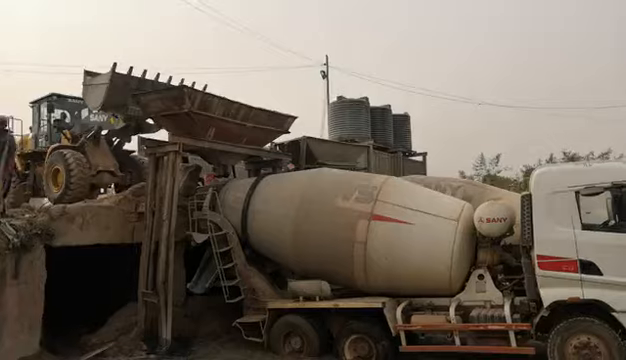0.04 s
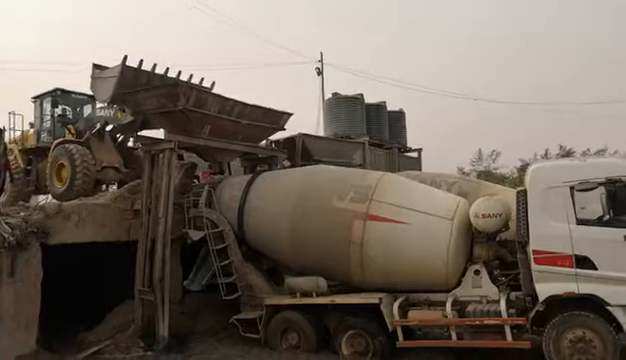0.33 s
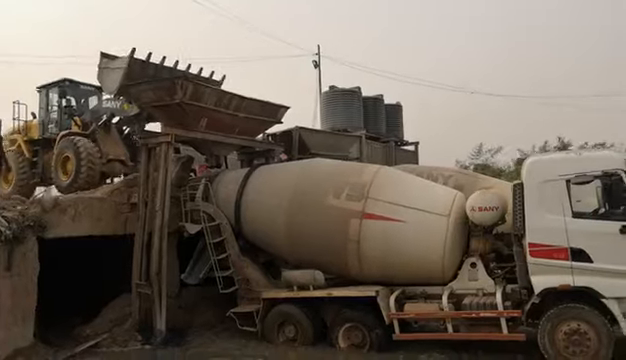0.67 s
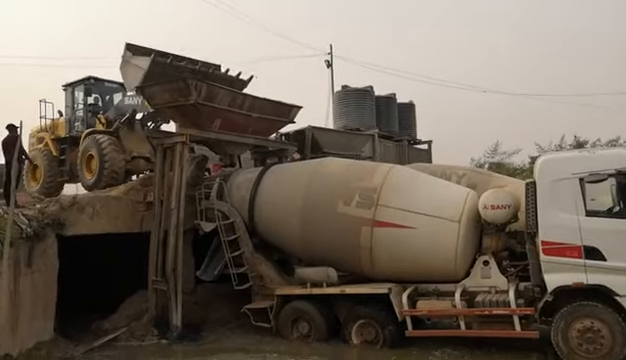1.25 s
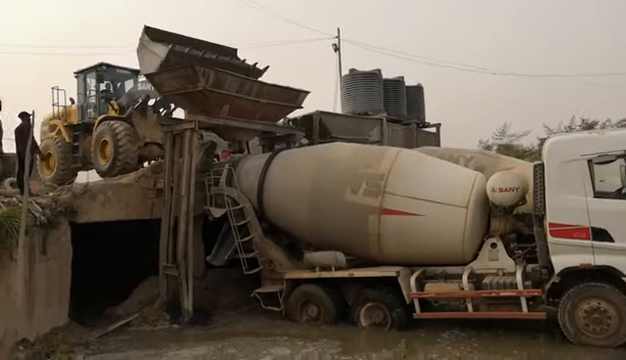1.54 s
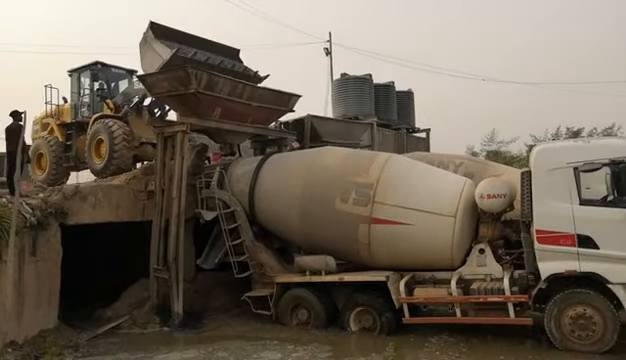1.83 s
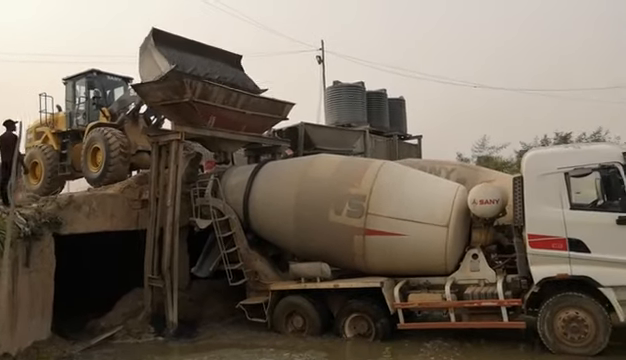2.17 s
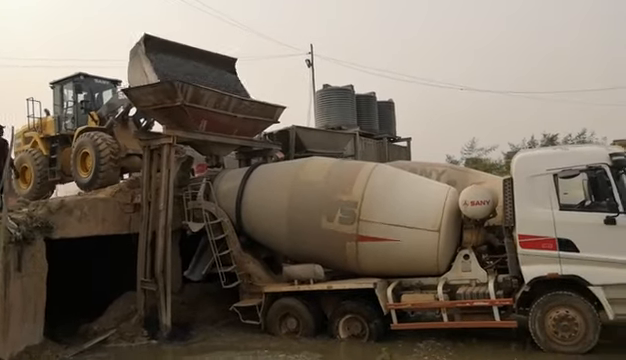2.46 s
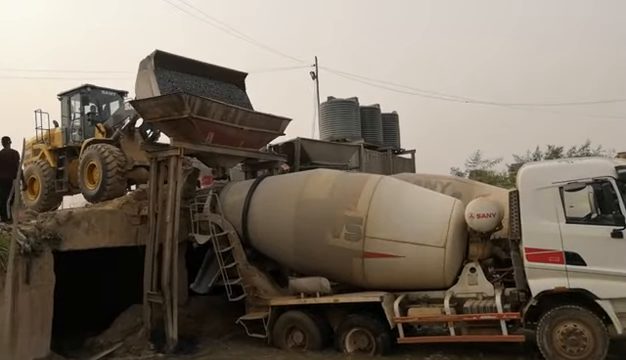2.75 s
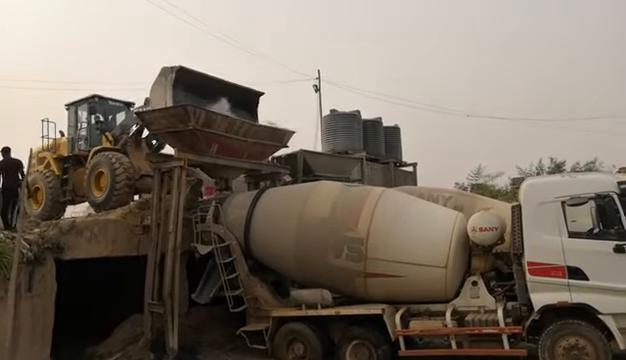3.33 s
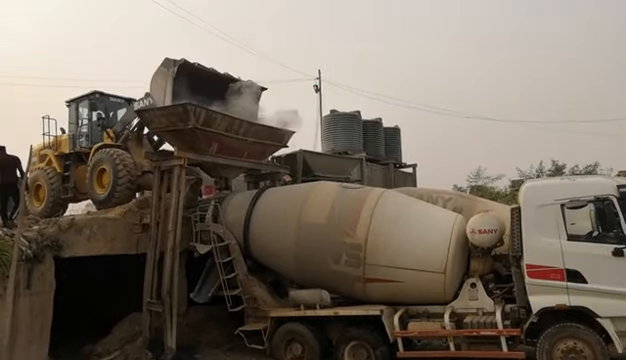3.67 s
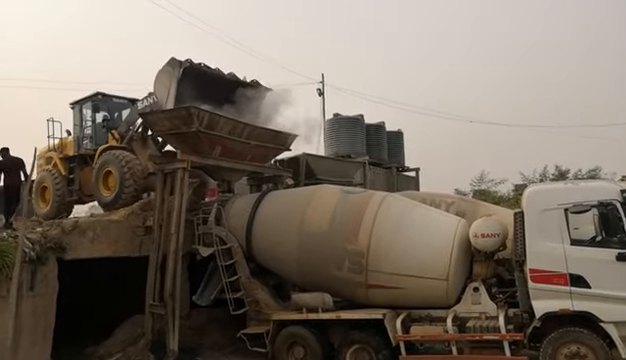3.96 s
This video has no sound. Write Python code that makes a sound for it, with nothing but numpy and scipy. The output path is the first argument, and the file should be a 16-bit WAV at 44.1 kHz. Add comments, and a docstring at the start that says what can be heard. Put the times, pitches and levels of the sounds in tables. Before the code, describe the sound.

A load of gravel rattles into a metal hopper outdoors. Two diesel engines rumble throughout, one idling and one rising in pitch, before sharp stone hits and a bucket clank start the loud, brief pour.

```python
"""Two diesels drone on a building site: a mixer truck idles, a wheel loader revs up to tip its bucket.
Their exhausts hum and rumble, and clatter pulses with the firings. Grit slides, the bucket clanks,
and the first stones crack into a steel hopper and set it ringing. Then the load of gravel rushes
after them, a swarm of tiny impacts, while an automatic gain control ducks the mix under the pour."""
import sys
import numpy as np
from scipy import signal
from scipy.fft import rfft, irfft
from scipy.io import wavfile
from scipy.ndimage import uniform_filter1d

SR = 44100
rng = np.random.default_rng(int(sys.argv[2]) if len(sys.argv) > 2 else 0)


def int16_out(signal):
    """Quantize to a 16-bit WAV file."""
    q = np.round(np.clip(np.atleast_2d(signal).T, -1, 1) * 32767)
    wavfile.write(sys.argv[1], SR, q.astype(np.int16))


N = 176400
T = np.arange(N) / SR

# Swell of the pour. Each row: time in seconds, level in dB.
POUR_LEVEL = [(2.6, -34.5), (2.67, -20), (2.705, -10.5), (2.77, -16), (2.82, -8.5), (2.94, -5),
              (3.04, -10.5), (3.12, -6), (3.21, -14.5), (3.28, -16.5), (3.34, -20), (3.47, -19),
              (3.55, -14), (3.67, -24.5), (3.85, -26.5), (4, -24)]
# Single stones on steel. Each row: start in seconds, level in dB, left over right in dB,
# brightness in dB per octave.
STONE_HITS = [(2.4333, -6.5, -6.5, 1), (2.4364, -10, 2, -5), (2.6235, -15, 10, 2.5), (2.6651, -15, 7, 1),
              (2.6868, -19, 0, -4), (2.699, -6, -5, -11), (2.757, -11, -6, -1), (2.811, -8, -2, -14),
              (2.9379, -7, 3, -2), (2.975, -7, -5.5, -1), (3.088, -9.5, -12, 4.5), (3.2704, -19, -3, -7),
              (3.8132, -18.5, 1, 6), (3.8996, -17.5, -1, -5.5)]
# Dull blows on the tipping bucket. Each row: start in seconds, level in dB.
BUCKET_HITS = [(2.6245, -12.5), (2.6653, -19)]
# Grit sliding as the bucket tilts. Each row: peak time in seconds, half-width in seconds, level in dB.
GRIT_SWELLS = [(0.55, 0.036, -38.5), (1.36, 0.0088, -32.5), (1.408, 0.013, -32.5), (1.968, 0.02, -33.5),
               (2.035, 0.016, -34), (2.09, 0.048, -35.5)]
# Ring of the steel. Each row: pitch in Hz, level in dB, seconds to fade by 60 dB.
HOPPER_MODES = [(714, -23.5, .05), (1039.7, -13, 0.045), (1208, -11, 0.044), (1350, -16, 0.034),
                (1772, -9.5, 0.044), (2240.6, -10.5, 0.053), (2330, -16, 0.049), (2760, -17, 0.022),
                (3477, -12.5, 0.086), (3986, -7.5, 0.033), (4260, -21, 0.027), (7100, -7, 0.012)]
BUCKET_MODES = [(1019, -12.5, 0.1495), (1804, -3, 0.076), (3500, -11, 0.063), (6860, -7.5, 0.092)]
# Tone colour of each noise layer. Each row: frequency in Hz, relative spectral density in dB.
GRAVEL_COLOUR = [(200, -5.5), (340, -4), (450, -17), (660, -5), (1050, -3.5), (1400, -3.5), (1900, 3),
                 (2450, 1.5), (3000, -4.5), (4000, -5.5), (4900, -10), (6300, -5.5), (7500, -6)]
CRACK_COLOUR = [(400, -15), (1000, -7), (1900, -1.5), (2700, 6.5), (3250, 0), (4050, 3), (5000, -9),
                (6600, 0.5), (7500, 6), (8300, -7.5)]
GRIT_COLOUR = [(1200, -15), (2000, -2), (3800, 2.5), (5600, 2.5), (7500, -5.5)]
RUMBLE_COLOUR = [(20, -6.5), (35, -17), (60, 4.5), (100, -2), (150, 0.5), (220, -2.5), (270, -7), (340, -5),
                 (430, -18.5), (600, -39)]
CLATTER_COLOUR = [(400, -10.5), (510, -10), (680, -3), (1000, -4.5), (1300, -4), (1850, 1), (2650, -1.5),
                  (3150, -18), (4000, -16.5), (4700, -19.5), (6300, -22.5), (7500, -31)]
# The loader revving. Each row: time in seconds, firing rate in Hz, gain in dB.
LOADER_REVS = [(.36, 73.8, -14), (.7, 68.04, -16), (.82, 66.2, 2), (1.03, 63.66, 3), (1.22, 66.8, 0.5),
               (1.5, 78.7, -0.5), (1.75, 89.4, -5), (1.95, 94.3, 3), (2.08, 94.6, 0.5), (2.25, 101.9, -7),
               (2.7, 103.2, -2.5), (3.1, 102, -6), (3.4, 96.06, 4), (3.6, 97.35, -6.5), (3.85, 98.15, -3),
               (4, 96.5, 2)]
# Its note grows ragged under load. Each row: time in seconds, roughness from 0 to 1.
LOADER_ROUGHNESS = [(1.1, 0.26), (1.5, 0.43), (2.1, 0.39), (3.3, .75)]
# Partials of each exhaust note. Each row: multiple of the firing rate, base level in dB.
LOADER_PARTIALS = [(1, -44.5), (2, -40), (2.5, -51.5), (3, -36), (4, -52.5)]
TRUCK_PARTIALS = [(.5, -49), (1, -28.5), (1.5, -43), (2, -44.5), (3, -44), (4, -44.5), (5, -45.5)]
# Fader moves for the truck's note, the rumble and the clatter. Each row: time in seconds, gain in dB.
TRUCK_FADER = [(.36, 1.5), (.74, 5.5), (.95, 1), (1.4, 2.5), (2.4, 2), (3.2, -4.5), (3.75, 1.5), (4, -2)]
RUMBLE_FADER = [(.36, -27), (.7, -28.5), (1.05, -33), (1.6, -29), (2.5, -31.5), (3.1, -38), (3.45, -28),
                (3.7, -29.5), (4, -30.5)]
CLATTER_FADER = [(.38, -28), (.53, -28), (.64, -30), (.73, -26), (.84, -30), (1.25, -30), (1.33, -28.5),
                 (1.55, -27.5), (1.6, -29), (1.635, -27.5), (1.7, -31), (1.98, -29), (2.04, -26.5),
                 (2.1, -29), (2.18, -30.5), (2.6, -30.5), (3.7, -26)]
# Loose panels. Each row: pitch in Hz, bandwidth in Hz, level against the clatter in dB.
PANEL_MODES = [(1788, 85, -12), (5530, 95, -20.5)]
# Stereo spread. Each row: frequency in Hz, side over mid in dB, left over right in dB (eased in the bass).
POUR_STEREO = [(200, -32.5, -19), (330, -15.5, -5.5), (530, -8, 7), (950, -17, 4), (1810, -4.5, -6.5),
               (2730, 2, 1), (4550, -1.5, -10), (7600, 0.5, 3.5)]
ENGINE_STEREO = [(50, -37.5, 6.5), (170, -44, 1), (308, -12, -3), (540, 0, -3.5), (940, -5, 0),
                 (1600, -4.5, -2.5), (2820, 2, 0.5), (4730, 0, -6), (7400, 5.5, -3)]

TRUCK_FIRING_HZ = 44.95
PIPE_HZ, PIPE_WIDTH_HZ = 199.6, 14.3  # where the loader's exhaust pipe booms
GRAIN_SPREAD_DB, GRAIN_DECAY_S = 2.5, 0.0047
CRACK_RISE_S, CRACK_DECAY_S, CLANK_RISE_S = 0.0017, 0.0035, 0.0026
MONO_BELOW_HZ, NOISE_TOP_HZ, MIX_TOP_HZ = 1500, 7500, 8450
DUCK_ABOVE_DB, DUCK_SLOPE, RELEASE_DB_PER_S, PEAK_CEILING = -17, 0.55, 27.5, 0.68


def gravel():
    """Pebbles click on each other and on the steel, blurring into a rush between the hopper walls."""
    clicks = contacts(per_second=1000)
    rush = coloured(lambda: grains(clicks), GRAVEL_COLOUR, POUR_STEREO, flicker_db=0.26)
    rush = rms_one(reflected(rush, t60=0.059, wet_db=-10.5))
    brightness = np.full(N, -1.5)  # dB per octave: small pebbles ring the high modes less
    steel = rms_one(low_pass(hopper(np.array([clicks, clicks]), brightness), NOISE_TOP_HZ))
    flow = from_db(in_time(POUR_LEVEL)[0] + 0.5 * drift(25))
    return flow * (from_db(0.33) * rush + from_db(-9.5) * steel)


def stones():
    """Each big stone gives a short crack and rings the hopper; the yard throws it back."""
    clicks, brightness, bursts = np.zeros((2, N)), np.zeros(N), 0
    for start, db, pan_db, tilt_db in STONE_HITS:
        gain, age = from_db(db) * panned(pan_db), np.maximum(T - start, 0)
        clicks[:, int(start * SR)] = gain[:, 0]
        brightness[int(start * SR)] = tilt_db
        bursts = bursts + gain * np.exp(-age / CRACK_DECAY_S) * (1 - np.exp(-age / CRACK_RISE_S))
    noise = coloured(white, CRACK_COLOUR, POUR_STEREO, flicker_db=7.5, top_hz=MIX_TOP_HZ)
    crack = from_db(-5) * bursts * noise
    steel = from_db(-1.5) * hopper(clicks, brightness)
    return reflected(steel + crack, t60=0.16, wet_db=-4)


def hopper(clicks, brightness):
    """Every contact drives each steel mode with a strength of its own."""
    hits, out = np.flatnonzero(clicks[0]), 0
    for hz, db, t60 in HOPPER_MODES:
        chance = rng.standard_normal((12000, 2))[np.arange(len(hits)) % 12000].T
        if hz < MONO_BELOW_HZ:  # low modes share one strength between the sides
            chance = chance[0]
        strength = np.sign(chance) * np.abs(chance) ** .5
        tilt = from_db(brightness[hits] * np.log2(hz / 2000))
        struck = np.zeros((2, N))
        struck[:, hits] = clicks[:, hits] * strength * tilt
        out = out + from_db(db) * ring(struck, hz, t60)
    return out


def bucket():
    """The shifting load makes the bucket clank: a soft attack, then a ring."""
    out = np.zeros((2, N))
    for start, db in BUCKET_HITS:
        age = np.maximum(T - start, 0)
        for hz, mode_db, t60 in BUCKET_MODES:
            envelope = (1 - np.exp(-age / CLANK_RISE_S)) * from_db(-60 * age / t60)
            phase = 2 * np.pi * hz * age + rng.uniform(0, 2.4, (2, 1))
            out += from_db(db + mode_db) * envelope * np.sin(phase)
    return reflected(out, t60=0.13, wet_db=-3.5)


def grit():
    """Fine grit hisses in short slides before the load lets go."""
    level = sum(from_db(db) * np.exp(-.5 * ((T - peak) / width) ** 2) for peak, width, db in GRIT_SWELLS)
    clicks = contacts(per_second=7200)
    return level * coloured(lambda: grains(clicks), GRIT_COLOUR, ENGINE_STEREO, flicker_db=1.5)


def engines():
    """The diesel bed: two exhaust notes, with rumble and clatter that pulse with the firings."""
    loader_hz, loader_db = in_time(LOADER_REVS)
    idle, rev = firing(TRUCK_FIRING_HZ, wander=0.0015), firing(loader_hz, wander=0.004)
    truck = exhaust(idle, TRUCK_PARTIALS, rough=0.15, boom_db=0)
    loader = exhaust(rev, LOADER_PARTIALS, rough=in_time(LOADER_ROUGHNESS)[0], boom_db=8)
    notes = from_db(in_time(TRUCK_FADER)[0]) * truck + from_db(loader_db) * loader
    knock = 1 + 0.24 * (np.cos(idle) + np.cos(rev)) / 2
    rumble = coloured(lambda: white() * knock, RUMBLE_COLOUR, ENGINE_STEREO, flicker_db=1.63)
    rumble *= from_db(in_time(RUMBLE_FADER)[0])
    clatter = coloured(lambda: white() * knock, CLATTER_COLOUR, ENGINE_STEREO, flicker_db=0.7)
    clatter = from_db(0.1 + in_time(CLATTER_FADER)[0]) * (clatter + panels(knock))
    return notes + rumble + reflected(clatter, t60=0.17, wet_db=-10)


def firing(hz, wander):
    """Phase of an engine's firing cycle, its speed slightly unsteady."""
    return 2 * np.pi * np.cumsum(hz * (1 + wander * drift(8.2))) / SR


def exhaust(phase, partials, rough, boom_db):
    """Partials of the firing rate, part steady and part ragged, lifted near the pipe's resonance."""
    out, firing_hz = 0, np.gradient(phase) * SR / (2 * np.pi)
    steady = np.sqrt(2 * (1 - rough ** 2))
    for multiple, db in partials:
        boom = boom_db / (1 + ((multiple * firing_hz - PIPE_HZ) / PIPE_WIDTH_HZ) ** 2)
        angle = multiple * phase + rng.uniform(0, 2 * np.pi)
        tone = (steady + rough * drift(22)) * np.sin(angle) + rough * drift(22) * np.cos(angle)
        out = out + from_db(db + boom) * tone
    return out


def panels(knock):
    """Loose panels ring with the engine knocks, wavering in pitch and strength."""
    out = 0
    for hz, width, db in PANEL_MODES:
        rattle = rms_one(ring(white() * knock, hz, t60=np.log(1000) / (np.pi * width)))
        playhead = np.cumsum(1 + 0.011 * drift(6)) % N  # uneven speed bends the pitch
        wavering = np.array([np.interp(playhead, np.arange(N), side) for side in rattle])
        out = out + from_db(db + 2 * drift(9)) * wavering
    return low_pass(out, NOISE_TOP_HZ)


def reflected(x, t60, wet_db):
    """Nearby surfaces add a dying scatter of reflections."""
    age = T[:SR // 2]
    tail = low_pass(rng.standard_normal((2, len(age))) * from_db(-60 * age / t60), NOISE_TOP_HZ)
    tail /= np.sqrt(np.sum(tail ** 2, axis=1, keepdims=True))
    return x + from_db(wet_db) * signal.fftconvolve(x, tail, axes=1)[:, :N]


def contacts(per_second):
    """Random clicks, mostly small, a few large."""
    strength = from_db(GRAIN_SPREAD_DB * np.minimum(rng.exponential(1, N), 4.5))
    return strength * (rng.random(N) < per_second / SR)


def grains(clicks):
    """Noise that flares at each contact."""
    power = signal.lfilter([1], [1, -np.exp(-1 / (GRAIN_DECAY_S * SR))], clicks ** 2 + 1e-18)
    return white() * np.sqrt(power)


def ring(clicks, hz, t60):
    """A unit click sets a sine of height 1 ringing."""
    decay, step = from_db(-60 / (t60 * SR)), 2 * np.pi * hz / SR
    return signal.lfilter([0, np.sin(step)], [1, -2 * decay * np.cos(step), decay ** 2], clicks + 1e-18)


def coloured(make_noise, colour, stereo, flicker_db, top_hz=NOISE_TOP_HZ):
    """Give a noise its tone colour, stereo width and balance, and a flickering level."""
    hz, stereo = np.maximum(np.fft.rfftfreq(N, 1 / SR), 1), np.array(stereo)
    mid, side = rfft(make_noise())
    bottom_hz = .8 * colour[0][0]
    band = 1 / np.sqrt((1 + (bottom_hz / hz) ** 8) * (1 + (hz / top_hz) ** 200))
    width = from_db(at_hz(stereo[:, :2], hz))
    balance = panned(at_hz(stereo[:, ::2], hz) * hz ** 2 / (hz ** 2 + 500 ** 2))  # bass stays centred
    spread = balance * (mid + width * side * [[1], [-1]]) / np.hypot(1, width)
    noise = irfft(band * from_db(at_hz(colour, hz)) * spread, N)
    return rms_one(noise) * from_db(flicker_db * drift(21))


def drift(rate_hz):
    """A smooth random wobble of unit power."""
    hop = 40  # samples per control step
    pole = np.exp(-2 * np.pi * rate_hz * hop / SR)
    slow = signal.lfilter([1], [1, -2 * pole, pole ** 2], rng.standard_normal(N // hop + 2002))[2000:]
    return np.interp(np.arange(N) / hop, np.arange(len(slow)), rms_one(slow))


def white():
    """Two unrelated noises."""
    return rng.standard_normal((2, N))


def low_pass(x, hz):
    """A steep treble cut."""
    return signal.sosfilt(signal.ellip(10, .3, 85, hz, fs=SR, output="sos"), x)


def in_time(rows):
    """Each column of a timed curve at every sample."""
    seconds, *columns = np.transpose(rows)
    return [np.interp(T, seconds, column) for column in columns]


def at_hz(rows, hz):
    """Read a curve on a log frequency axis."""
    row_hz, values = np.transpose(rows)
    return np.interp(np.log(hz), np.log(row_hz), values)


def panned(pan_db):
    """Left and right gains."""
    return from_db(np.array([[.5], [-.5]]) * pan_db)


def from_db(db):
    """Decibels to gain."""
    return 10 ** (np.asarray(db) / 20)


def rms_one(x):
    """Scale to unit power."""
    return x / np.sqrt(np.mean(x ** 2) + 1e-20)


def scene():
    """Engines throughout; grit slides, then the load falls."""
    return engines() + grit() + bucket() + stones() + gravel()


def record(dry):
    """The sound cuts in; gain control ducks the loud part, peaks are rounded, the top is cut."""
    power = uniform_filter1d(np.mean(dry ** 2, axis=0), size=1764)  # 40 ms
    level_db = 10 * np.log10(np.maximum(power, 1e-12))
    duck_db = np.maximum(level_db - DUCK_ABOVE_DB, 0) * DUCK_SLOPE
    held_db = np.maximum.accumulate(duck_db + RELEASE_DB_PER_S * T) - RELEASE_DB_PER_S * T
    ducked = dry * from_db(-uniform_filter1d(held_db, size=441)) * (T > 0.361)
    rounded = ducked / (1 + (ducked / PEAK_CEILING) ** 4) ** .25
    return low_pass(rounded, MIX_TOP_HZ)


dry = scene()
out = record(dry)
int16_out(out)
```